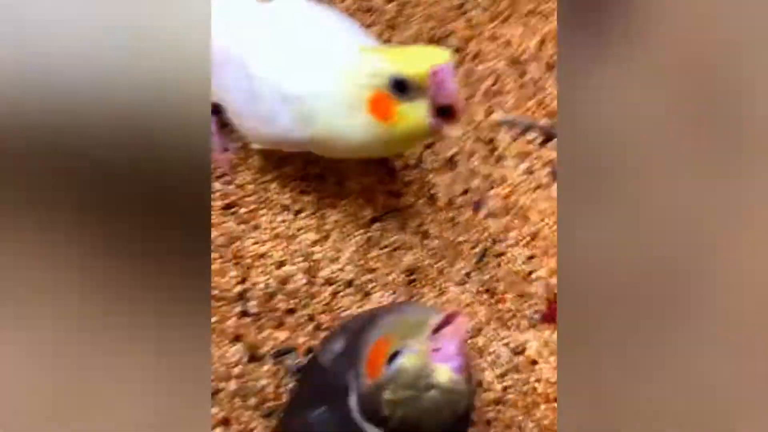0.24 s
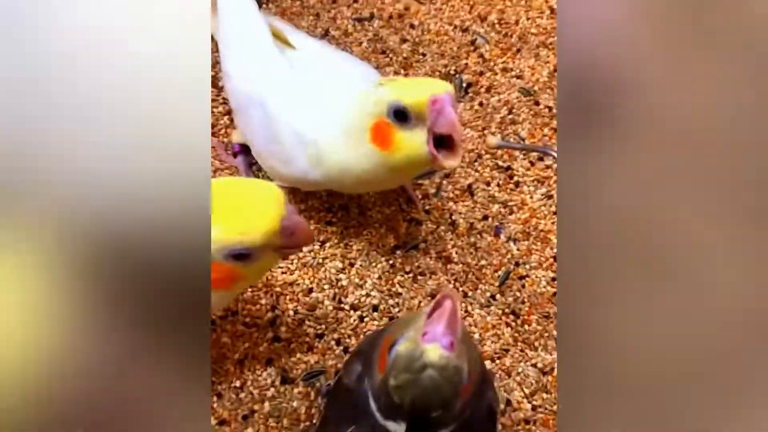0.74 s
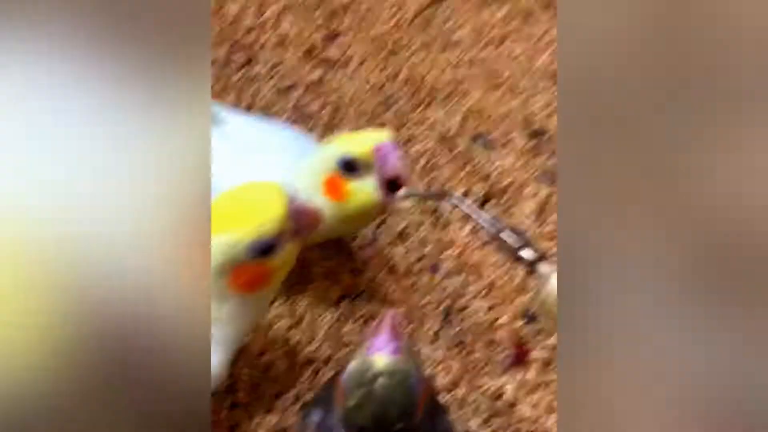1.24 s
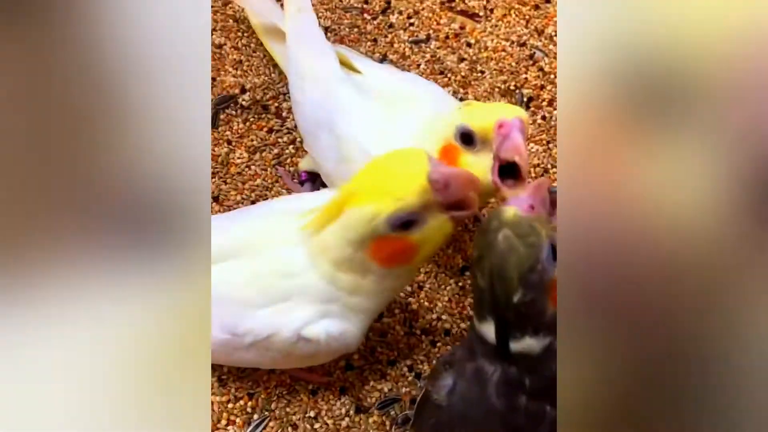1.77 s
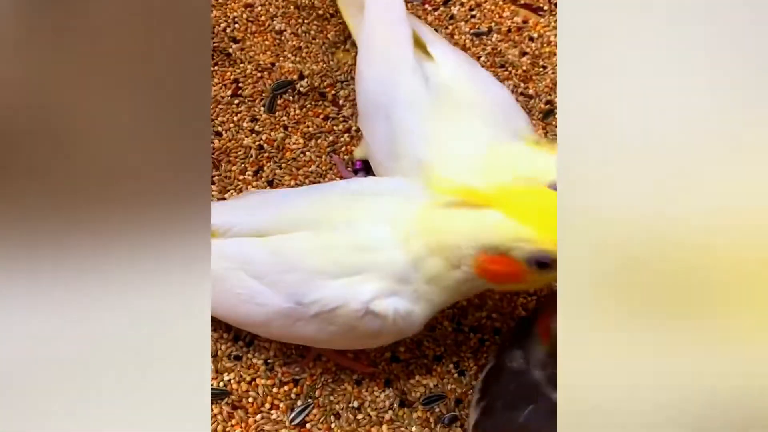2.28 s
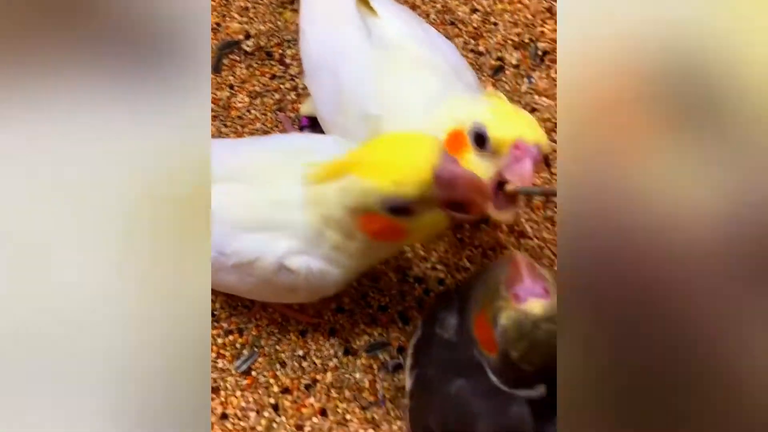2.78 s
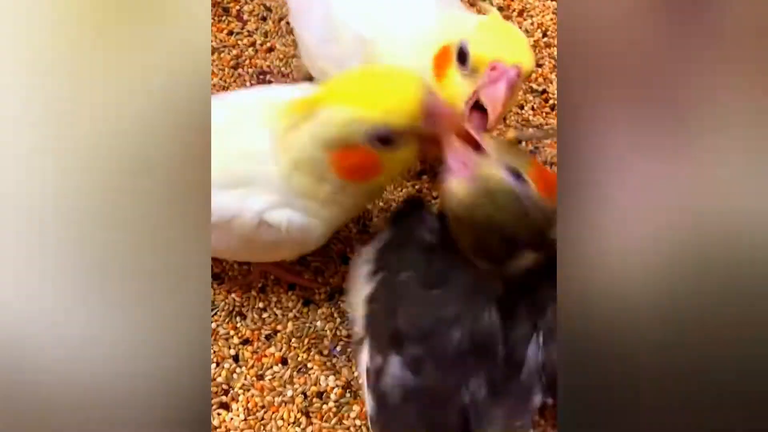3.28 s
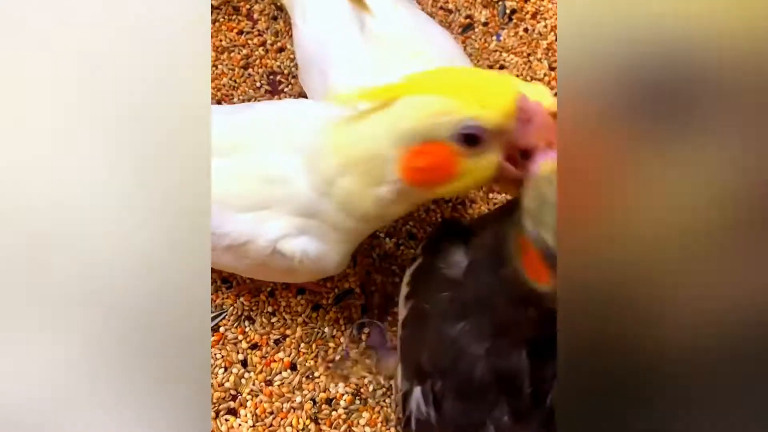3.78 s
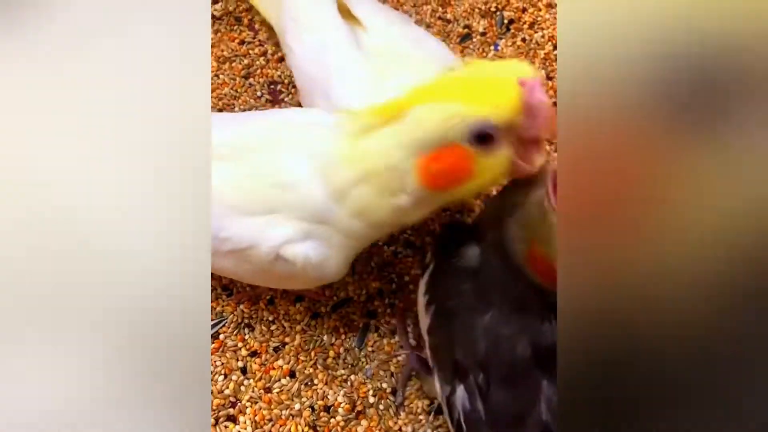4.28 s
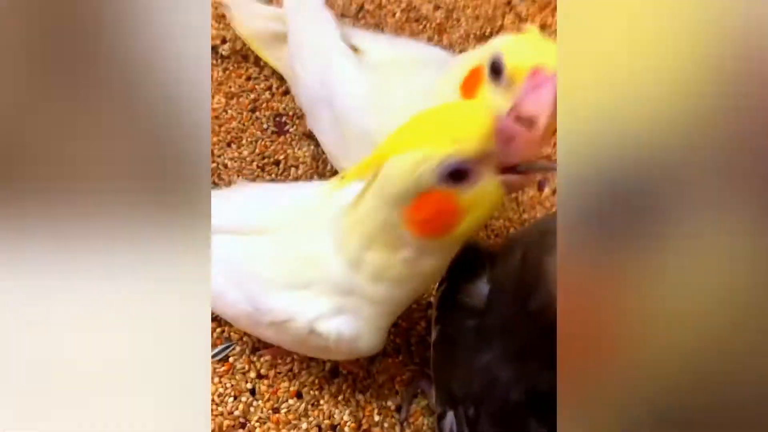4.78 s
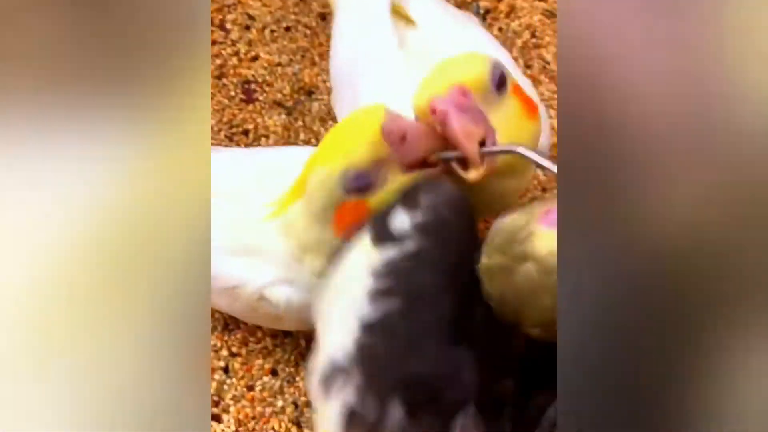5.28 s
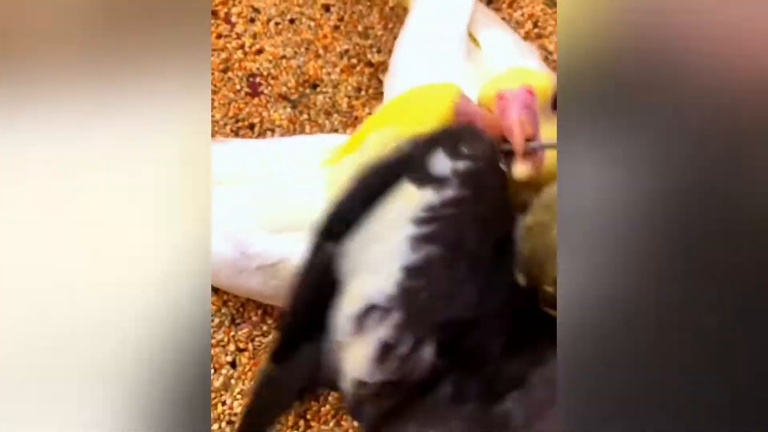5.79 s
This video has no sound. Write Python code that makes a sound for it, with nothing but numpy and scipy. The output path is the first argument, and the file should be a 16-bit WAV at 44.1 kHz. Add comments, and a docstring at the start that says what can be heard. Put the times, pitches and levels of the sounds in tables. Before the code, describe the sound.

Three baby cockatiels beg close to the microphone in a quiet room. Their raspy, breathy hissing runs for the whole six seconds in long, overlapping draws. In the first half second a faint whine wavers under it, and at about 0.4 seconds there is one dull knock on the seed tub with low puffs of air. Thin, high, wavering whistles ride on the rasp from the start until about 4.5 seconds, strongest around 4 seconds. Tiny squeaks break in here and there. Near 3 seconds one short cry rises huskily and falls clear. Faint falling chirps come at about 2.5 and 3.5 seconds, then five louder, sharp ones follow quickly between 5.3 and 5.9 seconds over the continuing hiss. Soft bumps and scuffs of the chicks jostling on seed are scattered throughout, with a slightly stronger bump and a low puff around 5.5 seconds.

```python
"""Baby cockatiels begging.

Three chicks beg for food, close by on a bed of seed in a quiet room. Air rasps through their open
throats in long draws. Thin whistles ride on the rasp, and now and then the syrinx catches in a squeak,
a whine, a short cry or a falling chirp. Their jostling makes soft bumps and scuffs and one knock on
the seed tub, with a few low puffs of air."""
import sys
import numpy as np
from scipy import signal
from scipy.fft import rfft, irfft, next_fast_len
from scipy.io import wavfile

SR = 44100
rng = np.random.default_rng(int(sys.argv[2]) if len(sys.argv) > 2 else 0)


def persist_wave(psi):
    """Save psi, clipped to +-1, as 16-bit WAV."""
    counts = np.round(np.clip(psi, -1, 1) * 32767).astype(np.int16)
    wavfile.write(sys.argv[1], SR, np.atleast_2d(counts).T)


N = 266011
TIME = np.arange(N) / SR
CUTOFF_HZ = 15900


def from_db(db):
    """Decibels to gain."""
    return 10 ** (np.asarray(db) / 20)


def unit_rms(x):
    """Scale to unit power."""
    return x / np.sqrt(np.mean(x ** 2) + 1e-20)


def curve_at(rows, t):
    """Each column of a curve at the times t."""
    times, *columns = np.transpose(rows)
    return [np.interp(t, times, column) for column in columns]


def gain_at(spectrum, hz):
    """Gain of a spectrum at hz."""
    known_hz, db = np.transpose(spectrum)
    return from_db(np.interp(np.log(hz + 1), np.log(known_hz), db))


def noise(spectrum):
    """Coloured unit noise, rolled off below the spectrum's lowest point."""
    size = next_fast_len(N)
    hz = np.fft.rfftfreq(size, 1 / SR)
    colour = gain_at(spectrum, hz) * np.minimum(hz / spectrum[0][0], 1)
    return unit_rms(irfft(rfft(rng.standard_normal(size)) * colour, size)[:N])


def drift(rate_hz, size=N):
    """Random wavering up to about rate_hz, unit RMS."""
    run_in = SR // 10
    lowpass = signal.butter(2, rate_hz, fs=SR, output="sos")
    return unit_rms(signal.sosfilt(lowpass, rng.standard_normal(size + run_in))[run_in:])


def phase_of(hz):
    """Running phase of a moving frequency."""
    return 2 * np.pi * np.cumsum(hz) / SR


def resonance(hz, width_hz):
    """Turbulence ringing in a moving resonance, unit power."""
    phase = phase_of(hz)
    return drift(width_hz / 2, len(hz)) * np.cos(phase) + drift(width_hz / 2, len(hz)) * np.sin(phase)


def between(start_s, end_s):
    """Sample indices of an interval and the progress 0-1 through it."""
    at = np.flatnonzero((TIME >= start_s) & (TIME <= end_s))
    return at, (TIME[at] - start_s) / (end_s - start_s)


def fade(at, start_s, end_s, attack_s, release_s):
    """Gate with linear attack and release."""
    return np.clip(np.minimum((TIME[at] - start_s) / attack_s, (end_s - TIME[at]) / release_s), 0, 1)


def note(rows, edge_s=0.0007):
    """Sample indices, pitch and soft-edged gain of a (time, pitch, level) curve."""
    at, _ = between(rows[0][0], rows[-1][0])
    hz, db = curve_at(rows, TIME[at])
    return at, hz, from_db(db) * fade(at, TIME[at[0]], TIME[at[-1]], edge_s, edge_s)


# Room tone spectrum: (frequency [Hz], relative density [dB])
ROOM_SPECTRUM = [(25, -16), (100, -4), (250, -5.5), (600, 2.5), (1200, -4.5), (4000, -8.5)]


def room_tone(level_db=-50):
    """Faint, steady noise of the room."""
    return from_db(level_db) * noise(ROOM_SPECTRUM)


def reflections(x, t60_s, top_hz, delay_s=0.004):
    """Dull, decaying tail of wall reflections."""
    t = TIME[:SR // 2]
    tail = rng.standard_normal(len(t)) * from_db(-60 * t / t60_s) * (t > delay_s)
    tail /= np.sqrt(np.sum(tail ** 2))
    lowpass = signal.butter(2, top_hz, fs=SR, output="sos")
    return signal.sosfilt(lowpass, signal.fftconvolve(x, tail)[:N])


def swells(rows, spectrum):
    """Noise bursts with exponential swell and decay."""
    gain = np.zeros(N)
    for peak_s, db, swell_s, decay_s in rows:
        falloff = np.maximum((peak_s - TIME) / swell_s, (TIME - peak_s) / decay_s)
        gain += from_db(db) * np.exp(-np.minimum(falloff, 20))
    return gain * noise(spectrum)


# Air puffs: (time [s], level [dB], swell [s], decay [s])
PUFFS = [(.395, -34, 0.027, 0.016), (.445, -32, 0.0079, 0.014), (.5, -36.5, 0.016, 0.0099),
         (.575, -44, 0.015, 0.041), (1.35, -54, 0.078, 0.048), (4.9, -46, 0.017, 0.019),
         (5.54, -33.5, 0.027, 0.013)]
# Puff spectrum: (frequency [Hz], relative density [dB])
PUFF_SPECTRUM = [(30, -20), (50, -2), (85, -2.5), (170, -5), (280, -17), (600, -53), (2000, -70)]


def puffs():
    """Close puffs of air, heard as low rumbles."""
    return swells(PUFFS, PUFF_SPECTRUM)


# Bumps and scuffs: (time [s], level [dB], swell [s], decay [s])
BUMPS = [(.195, -32, 0.0051, 0.0043), (.395, -35.5, 0.029, 0.0079), (.43, -29, 0.007, 0.0092),
         (1.645, -43, 0.014, 0.087), (1.911, -30, 0.0013, 0.0043), (2.795, -43, 0.004, 0.049),
         (4.578, -31.5, 0.0049, 0.037), (4.82, -33.5, 0.0026, 0.0043), (4.95, -30, 0.00089, 0.0056),
         (5.085, -35.5, 0.0044, 0.024), (5.405, -42.5, 0.16, 0.063), (5.525, -25.5, 0.011, 0.0075)]
# Scuff spectrum: (frequency [Hz], relative density [dB])
SCUFF_SPECTRUM = [(30, -9), (80, -7), (170, 1), (300, 0.5), (385, 2.5), (480, -1.5), (620, 1.5),
                  (900, -4.5), (1300, 2.5), (3000, -51)]


def bumps():
    """Jostling chicks bump and scuff on the seed."""
    return swells(BUMPS, SCUFF_SPECTRUM)


# Blows on the seed tub: (time [s], level [dB])
BLOWS = [(0.425, -15), (0.4309, -20)]
# Tub modes: (frequency [Hz], relative level [dB], t60 [s])
TUB_MODES = [(223, -16, 0.23), (301, 1.5, 0.055), (456, 3.5, 0.045), (745, -3.5, 0.024)]


def tub_knock():
    """A double blow sets the tub ringing briefly."""
    out = np.zeros(N)
    for start_s, blow_db in BLOWS:
        t = np.clip(TIME - start_s, 0, 1)
        for hz, mode_db, t60_s in TUB_MODES:
            out += from_db(blow_db + mode_db - 60 * t / t60_s) * np.sin(2 * np.pi * hz * t)
    return out


def thin_tone(hz, rough, overtone_db, jitter_hz=100, shimmer_db=5, halo_width_hz=620):
    """Pitched core that trembles and gives way to a breathy halo as rough goes from 0 to 1."""
    phase = phase_of(hz + rough * jitter_hz * drift(200, len(hz)))
    shimmer = unit_rms(from_db(rough * shimmer_db * np.minimum(drift(90, len(hz)), 1)))
    core = unit_rms(np.sin(phase) + from_db(overtone_db) * np.sin(2 * phase))
    halo_gain = 0.8 * rough
    return shimmer * (np.sqrt(1 - halo_gain ** 2) * core + halo_gain * resonance(hz, halo_width_hz))


# Whine contour: (time [s], pitch [Hz], level [dB])
WHINE_CURVE = [(.08, 1360, -35), (.11, 1193, -33), (.16, 1263, -30), (.235, 1481, -28), (.3, 1344, -27.5),
               (.38, 1288, -32), (.53, 1340, -40)]


def whine():
    """One low, nearly clean tone that dips and lifts."""
    at, hz, gain = note(WHINE_CURVE)
    out = np.zeros(N)
    out[at] = gain * thin_tone(hz, rough=0.36, overtone_db=-18)
    return out


# Cry contour: (time [s], pitch [Hz], octave level [dB], fundamental level [dB])
CRY_CURVE = [(2.853, 1472, -43, -30), (2.879, 1290, -38, -28.5), (2.9, 1402, -34, -28),
             (2.924, 1563, -16.5, -24), (2.943, 1668, -12, -23), (2.957, 1772, -14.5, -41),
             (2.974, 1920, -22, -35), (3.024, 2168, -30, -29), (3.041, 2006, -20, -29),
             (3.056, 1870, -19, -35), (3.068, 1667, -15, -28), (3.079, 1584, -13, -23),
             (3.092, 1556, -19, -29), (3.097, 1560, -45, -45)]


def cry(wobble=0.024, wobble_hz=170, shimmer_db=0.5, clear_s=3.012, gush_hz=4750):
    """An arched cry with a strong octave rises husky in a gush of air and falls clear."""
    start_s, end_s = CRY_CURVE[0][0], CRY_CURVE[-1][0]
    at, _ = between(start_s, end_s)
    hz, octave_db, fundamental_db = curve_at(CRY_CURVE, TIME[at])
    hoarse = fade(at, start_s, clear_s, attack_s=0.078, release_s=0.011)
    rough = np.maximum(hoarse, 0.22)
    phase = phase_of(hz * (1 + wobble * rough * drift(wobble_hz, len(at))))
    overtones = sum(from_db(-18 - 5 * (k - 3)) * np.sin(k * phase) for k in range(3, 8))
    fundamental = from_db(fundamental_db) * np.sin(phase)
    upper = from_db(octave_db) * (np.sin(2 * phase) + overtones)
    gush = from_db(-26) * resonance(np.full(len(at), gush_hz), width_hz=1700)
    husk = from_db(-33) * resonance(hz, width_hz=380)
    shimmer = from_db(shimmer_db * rough * drift(wobble_hz, len(at)))
    out = np.zeros(N)
    out[at] = np.sqrt(2) * (fundamental + upper) * shimmer + hoarse * (gush + husk)
    return out


# Response of throat and open beak: (frequency [Hz], relative gain [dB])
TRACT_RESPONSE = [(1400, -32), (2100, -9), (3000, 3.5), (4100, 4.5), (5000, -1), (6000, 5), (7800, 4.5),
                  (9000, -12.5), (10200, -3), (11400, 2), (12700, -6), (15000, -11)]


def syrinx(at, hz, gain, slope_db_oct, jitter, shimmer_db, pure_hz=4900, pure_db_oct=-13, top_hz=14000):
    """Syrinx harmonics shaped by the tract; they fall off faster for pitches above pure_hz."""
    k = np.arange(1, 9)[:, None]
    high_register = (1 + np.tanh((hz - pure_hz) / 500)) / 2
    tilt = from_db((slope_db_oct + pure_db_oct * high_register) * np.log2(k))
    muffle = (k * hz < CUTOFF_HZ) / np.sqrt(1 + (k * hz / top_hz) ** 10)
    weights = gain_at(TRACT_RESPONSE, k * hz) * tilt * muffle
    weights /= np.sqrt(np.sum(weights ** 2, axis=0) / 2)
    phase = phase_of(hz * (1 + jitter * drift(1300, len(at))))
    shimmer = from_db(shimmer_db * drift(220, len(at)))
    out = np.zeros(N)
    out[at] = gain * shimmer * np.sum(weights * np.sin(k * phase), axis=0)
    return out


# Squeaks: (centre [s], length [s], first pitch [Hz], last pitch [Hz], level [dB])
SQUEAKS = [ (0.473, 0.0098, 1970, 2100, -10.5), (0.6184, 0.0061, 1796, 2200, -12),
           (1.651, 0.017, 2870, 2760, -14.5), (1.7747, 0.012, 1815, 2400, -11),
           (2.02, 0.0089, 3000, 2880, -21.5), (2.099, 0.014, 1656, 2190, -15),
           (2.126, 0.017, 4200, 3930, -23.5), (2.133, 0.011, 3260, 2870, -16),
           (2.268, 0.017, 3650, 3000, -19.5), (2.414, 0.011, 3830, 3180, -16),
           (2.558, 0.0094, 4110, 3700, -16), (3.01, 0.0054, 1810, 2230, -7), (3.451, 0.02, 5810, 5920, -14),
           (5.38, 0.004, 1780, 2390, -11.5), (5.383, 0.0059, 2740, 2520, -14),
           (5.587, 0.015, 7500, 6200, -12.5), (5.591, 0.027, 6330, 5420, -13),
           (5.604, 0.014, 3880, 3500, -8), (5.614, 0.0066, 3990, 3700, -12),
           (5.891, 0.014, 5790, 5440, -21), (5.899, 0.0066, 3160, 3030, -19), ]


def squeaks(edge_db=-25.5):
    """The voice catches for milliseconds on a quick glide; louder is shriller."""
    out = np.zeros(N)
    progress = np.linspace(0, 1, 9)
    loudest_db = max(row[-1] for row in SQUEAKS)
    for centre_s, length_s, first_hz, last_hz, db in SQUEAKS:
        times = centre_s + length_s * (progress - 0.5)
        glide_hz = first_hz + (last_hz - first_hz) * progress
        swell_db = db + edge_db * (2 * progress - 1) ** 2
        at, hz, gain = note(np.column_stack([times, glide_hz, swell_db]))
        slope_db_oct = -4 + 0.31 * (db - loudest_db)
        out += syrinx(at, hz, gain, slope_db_oct, jitter=0.0053, shimmer_db=0.5)
    return out


# Chirps: (mid-fall [s], hold before [s], hold after [s], top pitch [Hz], end pitch [Hz], level [dB])
CHIRPS = [(2.555, 0.0055, 0.0023, 6100, 3570, -24), (3.461, 0.0034, .003, 5960, 4500, -27),
          (5.321, 0.002, 0.006, 4870, 2890, -17), (5.454, 0.0073, 0.0035, 6100, 3200, -9.5),
          (5.61, 0.011, 0.0056, 6050, 3170, -18.5), (5.73, 0.006, 0.0005, 5870, 4180, -13),
          (5.879, 0.0099, 0.0048, 5930, 3300, -12.5)]


def chirps(attack_s=0.023, release_s=0.0079, edge_db=-29, crest_s=0.0039, fall_s=0.0049,
           arch_hz_per_s2=3.5e6, onset_hz=4300):
    """The voice swells up to a high note, drops steeply and stops; louder is shriller."""
    out = np.zeros(N)
    loudest_db = max(row[-1] for row in CHIRPS)
    for mid_s, before_s, after_s, top_hz, end_hz, db in CHIRPS:
        corners_s = mid_s + np.array([-before_s - attack_s, -before_s, after_s, after_s + release_s])
        at, _ = between(corners_s[0], corners_s[-1])
        to_crest_s = np.maximum(mid_s - max(before_s, crest_s) - TIME[at], 0)
        rise_hz = np.maximum(top_hz - arch_hz_per_s2 * to_crest_s ** 2, onset_hz)
        fall = (1 - np.tanh((TIME[at] - mid_s) / fall_s)) / 2
        hz = end_hz + (rise_hz - end_hz) * fall
        gain = from_db(db + np.interp(TIME[at], corners_s, [edge_db, 0, 0, edge_db]))
        slope_db_oct = -2.5 + 0.59 * (db - loudest_db)
        out += syrinx(at, hz, gain, slope_db_oct, jitter=0.022, shimmer_db=1.5,
                      pure_hz=5100, pure_db_oct=-16)
    return out


def escaping_air(voice, gain_db=-15):
    """Air hisses out with every cycle of a forced note."""
    bandpass = signal.butter(2, [5500, 12500], "band", fs=SR, output="sos")
    return from_db(gain_db) * signal.sosfilt(bandpass, voice * rng.standard_normal(N))


# Whistle cracks: (time [s], relative level [dB], half pitch [Hz])
CRACKS = [(1.8532, -21, 2490), (1.8896, -20, 2360), (1.9048, -14, 2460), (1.9202, -18, 2430),
          (1.9823, -15, 2410), (2.0612, -20, 2370), (3.1115, -20, 2430), (3.1582, -22, 2310),
          (3.1764, -20.5, 2400), (3.9783, -15, 2370), (4.0057, -18, 2580), (4.0442, -24, 2340),
          (4.0791, -18, 2430), (4.0966, -15, 2380), (4.4039, -20.5, 2250)]


def whistle_cracks(length_s=0.014, lead_s=0.005, gain_db=-3, third_db=-11):
    """Alternate cycles of a whistle briefly differ, sounding odd multiples of half its pitch."""
    out = np.zeros(N)
    for time_s, db, hz in CRACKS:
        at, progress = between(time_s - lead_s, time_s - lead_s + length_s)
        phase = 2 * np.pi * hz * (TIME[at] - time_s)
        tone = np.sin(phase) + from_db(third_db) * np.sin(3 * phase)
        out[at] += from_db(db + gain_db) * np.sin(np.pi * progress) ** 2 * tone
    return out


# Whistles: (start [s], length [s], first pitch [Hz], last pitch [Hz], arch [Hz], peak level [dB],
#   peak position [0-1], first roughness [0-1], last roughness [0-1])
WHISTLES = [ (0, 0.16, 4620, 5080, 7, -24.5, .78, 0.64, .65),
            (.214, 0.13, 2990, 2670, -24, -32, 0.19, .3, 0.63),
            (.84, 0.12, 3120, 3080, -18, -33, 0.27, .15, .3),
            (1.165, 0.11, 4950, 4470, 40, -20.5, .6, 0.83, 0.75),
            (1.474, .24, 3110, 3330, 25, -32, .26, 0.18, .35),
            (1.835, 0.23, 4710, 4620, 91, -20, 0.28, 0.67, .85),
            (2.3, .095, 4630, 4830, 21, -27.5, .65, .1, .5),
            (2.37, .11, 4900, 4650, 24, -24.5, 0.21, 0.8, .85),
            (2.471, .225, 4555, 4320, 45, -21.5, 0.49, .08, 0.8),
            (2.832, 0.16, 4100, 4700, 11, -24.5, 0.14, 0.73, 1),
            (3.02, 0.27, 4700, 4700, -50, -26, 0.17, .3, .95),
            (3.289, 0.233, 4810, 4770, -91.5, -21, 0.78, 0.21, .25),
            (3.505, .125, 4270, 3760, -130, -27, 0.19, .55, .8),
            (3.63, 0.087, 3860, 4060, 21, -26, .41, .5, .65),
            (3.739, 0.19, 4450, 4740, 28.5, -24.5, 0.9, 0.71, 0.66),
            (3.895, 0.25, 4696, 4546, 26.5, -16.5, 0.66, 0.61, 0.51),
            (4.295, .18, 4430, 4430, 70, -20, 0.73, 0.68, 0.32), ]


def whistles(edge_db=-5.5, waver_db=0.5, waver_hz=22, waver_rate_hz=40):
    """Thin whistles waver along shallow arches, each swelling to one peak; some are wrapped in rasp."""
    out = np.zeros(N)
    for start_s, length_s, first_hz, last_hz, arch_hz, db, peak, first_rough, last_rough in WHISTLES:
        end_s = start_s + length_s
        at, progress = between(start_s, end_s)
        hz = first_hz + (last_hz - first_hz) * progress + arch_hz * (1 - (2 * progress - 1) ** 2)
        hz += waver_hz * drift(waver_rate_hz, len(at))
        level_db = db + np.interp(progress, [0, peak, 1], [edge_db, 0, edge_db])
        level_db -= waver_db * drift(waver_rate_hz, len(at))
        gate = fade(at, start_s, end_s, attack_s=0.007, release_s=0.026)
        rough = first_rough + (last_rough - first_rough) * progress ** 2
        out[at] += gate * from_db(level_db) * thin_tone(hz, rough, overtone_db=-37)
    return out


# Hiss spectrum at the beak: (frequency [Hz], relative density [dB])
BEAK_SPECTRUM = [(500, -19), (900, -14), (1300, -6.5), (1650, -0.5), (2000, 0), (2400, -5.5), (2950, -3),
                 (3550, 1.5), (4600, 2), (5900, -3), (6600, -6.5), (8100, -11.5), (8700, -16), (10000, -54)]


def beak_hiss(swell_db=2.5, rate_hz=9, bands=14):
    """Hiss shifts colour as tongues and beaks move: each band swells on its own."""
    size = next_fast_len(N)
    hz = np.fft.rfftfreq(size, 1 / SR)
    spectrum = rfft(noise(BEAK_SPECTRUM), size)
    band_of_bin = np.digitize(hz, np.linspace(1900, 8000, bands - 1))
    out = np.zeros(N)
    for k in range(bands):
        band = irfft(spectrum * (band_of_bin == k), size)[:N]
        out += band * from_db(swell_db * drift(rate_hz))
    return unit_rms(out)


# Spectrum of the thin air above the hiss: (frequency [Hz], relative density [dB])
AIR_SPECTRUM = [(7000, 10), (8700, 4.5), (9300, 10.5), (10500, 5.5), (12300, 8.5), (13200, 7.5),
                (14000, -1.5), (15700, -1)]


def thin_air(swell_db=1, rate_hz=8):
    """High, slightly unsteady breath noise."""
    return noise(AIR_SPECTRUM) * from_db(swell_db * drift(rate_hz))


def voiced_ring(hz, jitter_hz, shimmer_db=3, overtone_db=-17):
    """The syrinx nearly holds a pitch, with an unsteady beat."""
    phase = phase_of(hz + jitter_hz * drift(200, len(hz)))
    tone = np.sin(phase) + from_db(overtone_db) * np.sin(2 * phase)
    return unit_rms(tone * from_db(shimmer_db * drift(230, len(hz))))


# Dips in the hiss: (centre [s], half length [s], depth [dB])
HISS_DIPS = [(.542, .018, -16), (.637, .014, -10), (.995, .012, -4), (1.465, .011, -4), (4.863, .016, -11),
             (5.266, .008, -5)]


def hiss_dips():
    """Gain that dips briefly, with a flat bottom."""
    return from_db(sum(db * np.exp(-np.minimum(((TIME - centre_s) / half_s) ** 4, 20))
                       for centre_s, half_s, db in HISS_DIPS))


# Begging draws, overlapping between birds; levels at 0 dB effort, before the ring tightens:
# (start [s], end [s], release [s], onset effort [dB], beak hiss [dB], thin air [dB],
#   throat first [Hz], throat last [Hz], throat [dB], mouth [Hz], mouth [dB], upper [Hz], upper [dB],
#   top [Hz], top [dB], ring first [Hz], ring last [Hz], breathy ring [dB], voiced ring [dB])
DRAWS = [ (-.1, 0.441, 0.011, -0.5, -27, -31, 3900, 4200, -31.5, 2480, -33.5, 4840, -31.5, 7100, -42, 1566, 1597, -43, -50),
         (-.1, 0.627, .008, -6, -27.5, -25, 3760, 4045, -25.5, 2250, -36, 5600, -27.5, 7800, -34, 1590, 1740, -30.5, -29.5),
         (.585, 1.781, .011, -4, -25, -27.5, 4470, 4190, -28.5, 2330, -34, 5390, -30.5, 6640, -34.5, 1556, 1533, -36.5, -33),
         (.79, 1.667, 0.0093, -4, -26.5, -31.5, 3914, 4280, -29.5, 2085, -52, 6040, -32, 8200, -42, 1635, 1752, -37, -31),
         (1.736, 2.131, 0.024, 3, -27.5, -38, 3880, 3810, -36.5, 2420, -42, 5300, -31, 7140, -36, 1597, 1571, -43, -35),
         (2.189, 3.016, .0059, -4.5, -27, -28.5, 3610, 3960, -36, 2340, -41, 5540, -37, 7800, -50, 1603, 1738, -35.5, -32),
         (2.196, 2.699, 0.037, 2, -32, -51, 3620, 3920, -38.5, 2156, -44, 5800, -48, 7000, -52, 1472, 1500, -41, -51),
         (2.829, 3.521, .043, -1, -28, -42, 3900, 3820, -33, 2350, -40, 4920, -39, 6800, -44.5, 1490, 1482, -40.5, -47),
         (3.48, 5.371, 0.1, 3, -34, -54, 3806, 3652, -31.5, 2400, -49, 4686, -38, 6900, -58, 1318, 1290, -46, -45.5),
         (3.727, 4.395, 0.28, -3, -24.5, -39, 3900, 4100, -47, 2370, -44, 5050, -35, 7020, -42, 1514, 1640, -32, -39.5),
         (4.327, 5.398, 0.067, -6, -21.5, -26, 4250, 3835, -27, 2480, -35, 5380, -35, 7280, -39, 1602, 1764, -31.5, -31.5),
         (5.355, 5.603, .011, -8, -26.5, -35.5, 3820, 3900, -46, 2490, -40, 4770, -51, 7100, -38, 1334, 1305, -39, -38),
         (5.578, 6.099, .013, -4, -28, -34.5, 3860, 3790, -33.5, 2390, -41, 4550, -50, 6780, -42, 1802, 1733, -35.5, -36.5),
         (5.564, 6.1, .015, 1.5, -42, -59, 3620, 3370, -40, 2550, -46, 5900, -57, 7500, -56, 2156, 2120, -38.5, -53),
         ]


def rasp(attack_s=0.05, unsteady_db=0.32, wander=0.01114, rattle_db=2.5, flutter_db=0.25,
         tighten_s=0.04, tighten_hz=110, tighten_db=4, air_db_per_db=2.03, voice_db_per_db=1.36):
    """Air through a slack syrinx rings five resonances; more effort is louder, airier, more voiced."""
    out, beak_power, air_power = np.zeros((3, N))
    dips = hiss_dips()
    for (start_s, end_s, release_s, onset_db, beak_db, air_db,
         throat_first_hz, throat_last_hz, throat_db, mouth_hz, mouth_db, upper_hz, upper_db,
         top_hz, top_db, ring_first_hz, ring_last_hz, breathy_db, voiced_db) in DRAWS:
        at, progress = between(start_s, end_s)
        effort_db = onset_db * (1 - progress) + unsteady_db * drift(8, len(at))
        gate = fade(at, start_s, end_s, attack_s, release_s)
        flow = gate * from_db(effort_db)
        waver = 1 + wander * drift(22, len(at))
        tight = np.exp((TIME[at] - end_s) / tighten_s)  # the ring curls up and swells at the end
        ring_hz = ring_first_hz + (ring_last_hz - ring_first_hz) * progress + tighten_hz * tight
        throat_hz = throat_first_hz + (throat_last_hz - throat_first_hz) * progress
        rattle = unit_rms(from_db(rattle_db * drift(60, len(at))))

        breathy_ring = from_db(breathy_db + tighten_db * tight) * resonance(ring_hz * waver, width_hz=190)
        throat = from_db(throat_db) * resonance(throat_hz * waver, width_hz=420)
        mouth = from_db(mouth_db) * resonance(mouth_hz * waver, width_hz=340)
        upper = from_db(upper_db) * resonance(upper_hz * waver, width_hz=650)
        top = from_db(top_db) * resonance(top_hz * waver, width_hz=900)
        out[at] += flow * (breathy_ring + rattle * (throat + dips[at] * (mouth + upper + top)))

        voice_gate = fade(at, start_s, end_s, attack_s, release_s=0.022)
        voice_gain = from_db(voiced_db + voice_db_per_db * effort_db + tighten_db * tight)
        jitter_hz = np.interp(progress, [0, 1], [40, 22])
        out[at] += voice_gate * voice_gain * voiced_ring(ring_hz, jitter_hz)

        beak_power[at] += (flow * from_db(beak_db)) ** 2
        air_power[at] += gate * from_db(air_db + air_db_per_db * effort_db) ** 2
    hiss = np.sqrt(beak_power) * beak_hiss() + np.sqrt(air_power) * thin_air()
    flutter = from_db(-flutter_db * drift(260))
    return (out + dips * hiss) * flutter


def scene():
    """The birds, their jostling and the quiet room, in mono."""
    birds = rasp() + whistles() + whistle_cracks() + whine()
    forced_notes = chirps() + squeaks()
    birds += forced_notes + escaping_air(forced_notes) + cry()
    jostling = tub_knock() + bumps() + puffs()
    near_walls = from_db(-15.5) * reflections(birds, t60_s=0.015, top_hz=8900)
    far_walls = from_db(-17.5) * reflections(birds, t60_s=1.0, top_hz=6100)
    return (birds + near_walls + far_walls + jostling + room_tone())[None]


def record(dry, ceiling=0.9):
    """Soft peak limiting, then a steep low-pass."""
    rounded = dry / (1 + (dry / ceiling) ** 6) ** (1 / 6)
    lowpass = signal.ellip(10, 0.1, 90, CUTOFF_HZ, fs=SR, output="sos")
    return signal.sosfilt(lowpass, rounded)


dry = scene()
out = record(dry)
persist_wave(out)
```